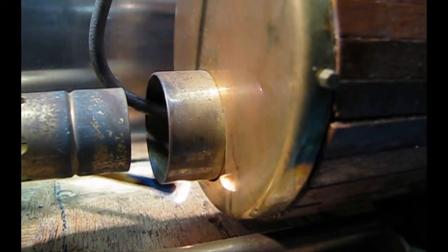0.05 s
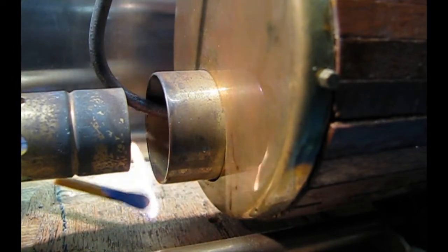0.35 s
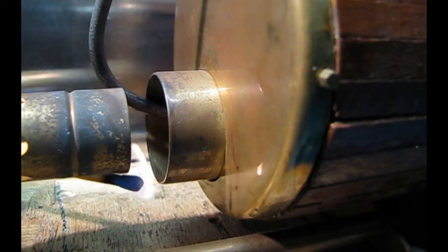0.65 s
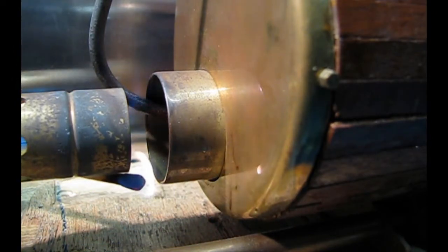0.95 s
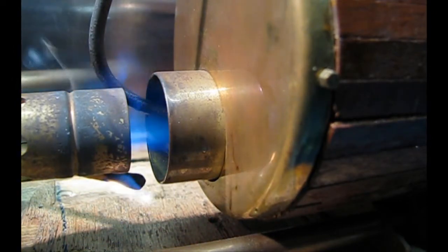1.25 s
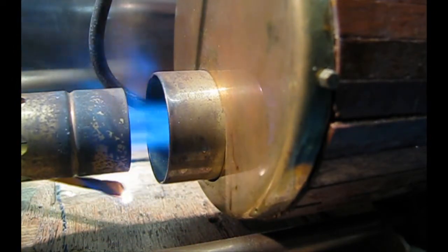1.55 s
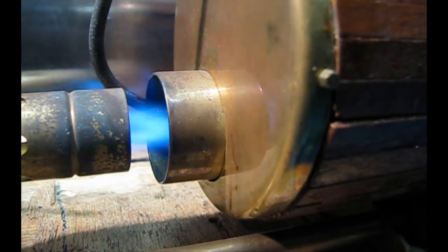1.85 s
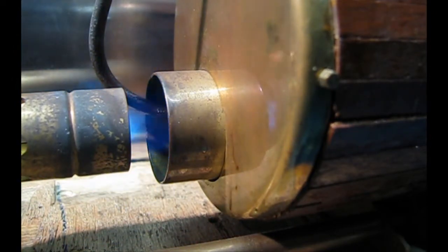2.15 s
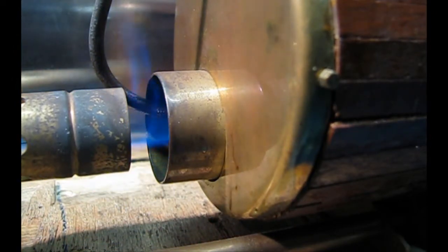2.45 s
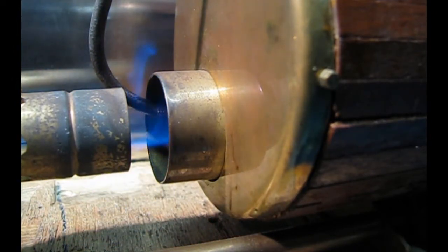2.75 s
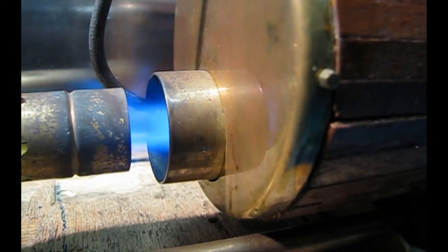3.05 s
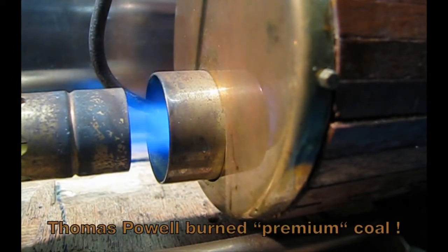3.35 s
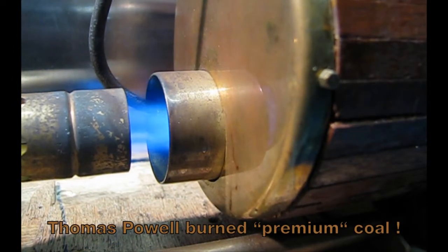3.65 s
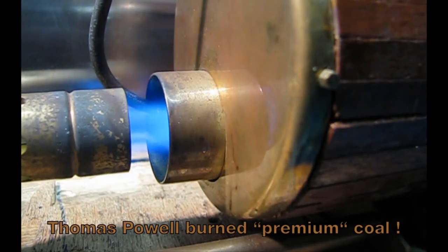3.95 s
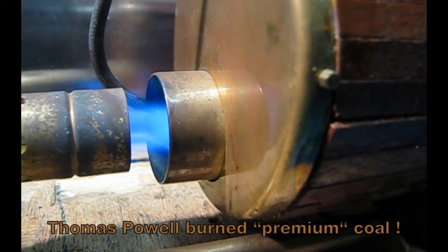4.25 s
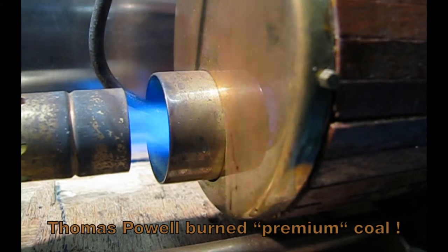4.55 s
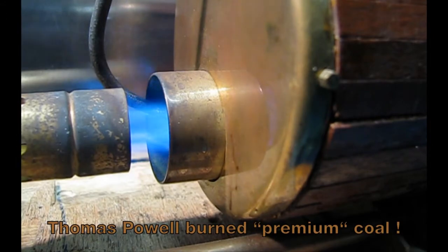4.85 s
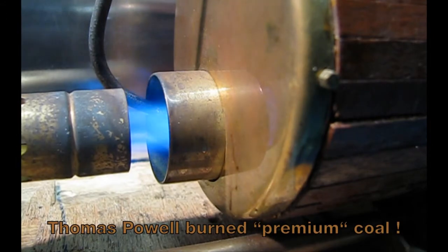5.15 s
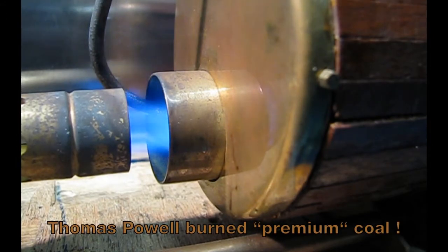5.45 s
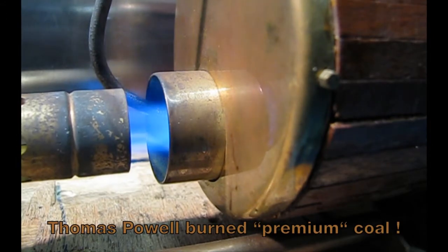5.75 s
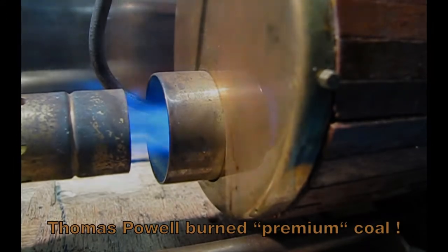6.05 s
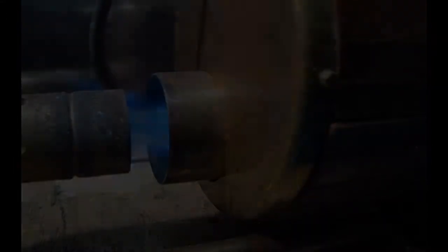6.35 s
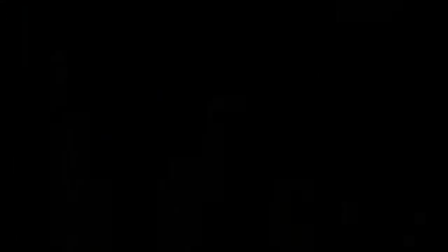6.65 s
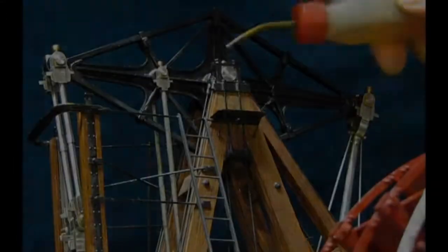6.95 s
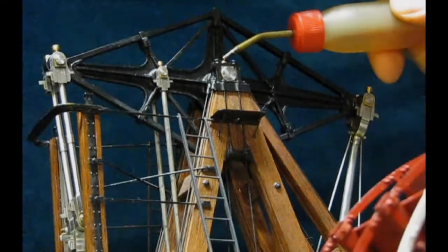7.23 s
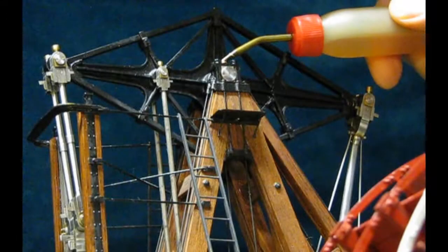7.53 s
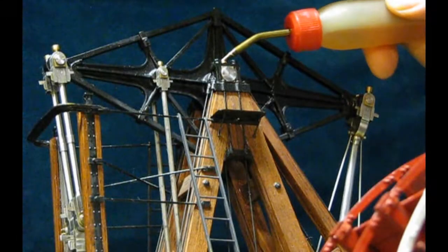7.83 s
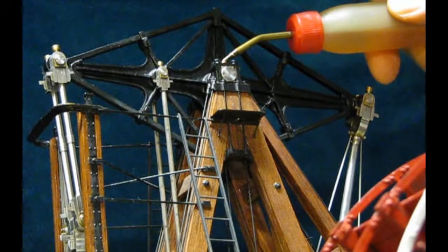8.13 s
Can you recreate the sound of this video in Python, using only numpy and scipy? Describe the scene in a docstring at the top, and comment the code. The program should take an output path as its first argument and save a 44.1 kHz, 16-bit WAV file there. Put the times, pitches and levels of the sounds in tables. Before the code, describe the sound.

Close to a small boiler, a valve squeaks briefly and metal ticks against metal over a faint hum. Gas lights with a weak sputter and a growing, half-whistling hiss, then thumps into a loud burn. The roar fades, crackles and drops out, leaving a soft hiss. Soon the flame is drawn back into the metal tube, where it roars evenly to the end with a few isolated pops.

```python
"""Light steel ticks and a valve's squeak over a low drone: a gas torch is lit at a small boiler's flue.
The gas catches, sputters and is drawn into the tube, snaps back out with a pop, hisses, then roars
steadily inside. The roar is turbulent burning, the pops are exploding pockets of gas, and the hiss is
the jet half whistling at its nozzle. The tube's resonances climb and sink with the heat of its gas."""
import sys
import numpy as np
from scipy import signal
from scipy.fft import rfft, irfft, next_fast_len
from scipy.io import wavfile
from scipy.ndimage import uniform_filter1d

SR = 44100
rng = np.random.default_rng(int(sys.argv[2]) if len(sys.argv) > 2 else 0)


def dump(signal):
    """Clip the signal to [-1, 1] and save it as 16-bit WAV at the path in sys.argv[1]."""
    limited = np.clip(np.atleast_2d(signal).T, -1, 1)
    pcm = np.round(limited * 32767).astype(np.int16)
    wavfile.write(sys.argv[1], SR, pcm)


N = 369999
SIZE, HOP = 1024, 256  # spectral frame and step, in samples
TIME, HZ = np.arange(N) / SR, np.fft.rfftfreq(SIZE, 1 / SR)
FRAME_TIME, SLOW_TIME = np.arange(-(-N // HOP) + 1) * HOP / SR, TIME[::16]

# speed of sound in the flue's gas, which tunes its resonances: time_s, pitch_factor
FLUE_HEAT = [(0, 0.69), (1.42, .74), (1.49, 0.83), (1.6, 0.985), (2, 0.91), (2.3, 0.76), (2.9, 0.74),
             (2.97, .84), (3.15, 0.99), (3.3, 1.014), (4.7, 0.987), (5.12, 1), (5.6, 1.055), (7, 1.073),
             (8.39, 1.074)]
# tone of burning gas: freq_hz, level_db
BURN_TONE = [(20, -49), (60, -19), (110, -6), (260, 0), (830, -0.5), (1100, -11.5), (1600, -15.5),
             (2200, -10), (2900, -18), (3500, -25.5), (5000, -30.5), (7700, -29.5), (8800, -40),
             (9400, -59)]
# unmoving peaks and dips of the torch head and collar: centre_hz, width_hz, gain_db
COLLAR_EQ = [(354, 100, 4.5), (522, 130, -2), (678, 55.5, 7), (1399, 146, -16.5), (5404, 450, 9.5)]
# hiss with the flame outside the flue: start_s, swallowed_s, final_db, growth_db_per_s, pitch_factor
HISS_SPELLS = [(1.136, 1.45, -27, 31.5, 1), (2.3, 2.94, -35, 13.5, 1)]
# the jet spits or falters: time_s, length_s, gain_db, pitch_factor_change
JET_SPITS = [(1.23, .05, 1, .035), (1.268, 0.02, -9, -.04), (1.292, 0.031, 7, .02),
             (1.348, .025, 1, -0.048), (1.393, 0.035, 9.5, .09), (1.547, 0.066, 10, .03),
             (2.425, 0.045, -9, -.04), (2.926, .036, 10.5, -0.041)]


def gain_of(db):
    """Decibels to amplitude."""
    return 10 ** (np.asarray(db) / 20)


def unit_rms(x):
    """Scales to rms 1."""
    return x / np.sqrt(np.mean(x ** 2) + 1e-20)


def spectrum(points, hz=HZ):
    """Points joined by straight lines over log frequency."""
    freqs, values = np.transpose(points)
    return np.interp(np.log(hz + 1), np.log(freqs + 1), values)


def curve(points, t=TIME):
    """Points joined by straight lines over time."""
    return np.interp(t, *np.transpose(points))


def bumps(rows, at):
    """Sum of bell shapes: centre, full width at half height, height."""
    return sum(height * np.exp2(-np.minimum((2 * (at - centre) / width) ** 2, 20))
               for centre, width, height in rows)


def fade(end, decay, t=TIME):
    """Holds 1 until the end, then dies away."""
    return np.exp(-np.clip((t - end) / decay, 0, 40))


def envelope(start, end, rise, decay, t=TIME):
    """Straight attack, hold, exponential release."""
    return np.clip((t - start) / rise, 0, 1) * fade(end, decay, t)


def add(mix, start_s, sound):
    """Lays a sound into the mix."""
    part = mix[round(start_s * SR):][:len(sound)]
    part += sound[:len(part)]


def wander(hz):
    """Random drift of rms 1 with changes up to about hz."""
    count = next_fast_len(len(SLOW_TIME))
    freqs = np.fft.rfftfreq(count, SLOW_TIME[1])
    drift = irfft(rfft(rng.standard_normal(count)) / (1 + (freqs / hz) ** 2), count)
    return np.interp(TIME, SLOW_TIME, unit_rms(drift[:len(SLOW_TIME)]))


def eddies(frames, bins):
    """Random patches over time and frequency, rms 1."""
    field = rng.standard_normal((len(FRAME_TIME), len(HZ)))
    return unit_rms(uniform_filter1d(uniform_filter1d(field, frames, axis=0), bins, axis=1))


def causal(db):
    """The minimum-phase response with this gain: it rings only after its cause."""
    cepstrum = irfft(np.log(gain_of(db)))
    cepstrum[..., 1:SIZE // 2] *= 2
    cepstrum[..., SIZE // 2 + 1:] = 0
    return np.exp(rfft(cepstrum))


def stereo(direct, scattered, response):
    """Colours a direct and a scattered signal and spreads them to left and right as mid and side."""
    likeness = [(20, 0.34), (100, .999), (300, 1), (1100, 0.98), (1400, 0.82), (2000, 0.98), (2900, 0.99),
                (3400, 0.43), (5200, 1), (5900, 0.39), (7200, 0.93), (8300, 0.86), (9200, 0.5),
                (16000, .55)]  # how alike the two channels are: freq_hz, coherence
    balance = [(300, 0), (900, 1.26), (1700, -2), (1950, -1), (2400, -0.5), (3130, 7.5), (3500, -3.5),
               (4100, -7.5), (4400, 9.5), (5350, 1), (6000, -2), (6500, -1), (8600, 0), (9400, 1)]  # left over right: freq_hz, gain_db
    phase_lead = [(1600, -0.01), (1850, 0.5), (2700, 0.91), (3300, 0.74), (3650, -0.5), (4000, 0.9),
                  (4250, 2), (4480, 1.5), (4750, 1.9), (5300, -1.3), (5550, -1), (6150, .5), (6600, -0.1),
                  (9000, 0)]  # left ahead of right: freq_hz, phase_rad
    framing = dict(nperseg=SIZE, noverlap=SIZE - HOP)
    coherence = np.clip(spectrum(likeness), 0, 1)
    mid = signal.stft(direct, **framing)[2].T * np.sqrt((1 + coherence) / 2)
    side = signal.stft(scattered, **framing)[2].T * np.sqrt((1 - coherence) / 2)
    lean = gain_of(spectrum(balance) / 2) * np.exp(.5j * spectrum(phase_lead))
    channels = np.array([(mid + side) * lean, (mid - side) / lean]) * response
    return signal.istft(channels, time_axis=1, freq_axis=2, **framing)[1][:, :N]


def background(drone_hz=57, drone_db=-38.5, waver=.54, waver_hz=6, draught_db=-42, calm_db=-62):
    """A soft wash of air and gas over a low drone and the rumble of draughts, which the jet stirs up."""
    wash_tone = [(45, -15.5), (90, -3.5), (160, -11.5), (360, -20.5), (530, -28.5), (1000, -26.5),
                 (1500, -31.5), (2300, -29), (4200, -34), (8500, -36), (10200, -37), (12000, -38),
                 (14300, -41), (15600, -46)]  # air and unlit gas: freq_hz, level_db
    wash_level = [(0, -38), (.7, -39.5), (1, -41.5), (2.4, -45.5), (8.39, -41)]  # their loudness: time_s, level_db
    whines = [(1030, 110, 2.5), (7880, 180, 5)]  # faint whines in the wash: centre_hz, width_hz, gain_db
    colour = gain_of(spectrum(wash_tone) + bumps(whines, HZ))
    wash = unit_rms(stereo(*rng.standard_normal((2, N)), colour)) * gain_of(curve(wash_level))
    phase = 2 * np.pi * drone_hz * TIME
    drone = (1 + waver * wander(waver_hz)) * np.cos(phase) + waver * wander(waver_hz) * np.sin(phase)
    drone = unit_rms(drone) * gain_of(drone_db) * fade(end=1.25, decay=.14)
    low_band = signal.butter(2, [18, 45], "band", fs=SR, output="sos")
    draught = signal.sosfilt(low_band, rng.standard_normal((3, N)))
    draught = unit_rms(draught[:2] * .37 + draught[2] * gain_of([[1.5], [-1.5]]))  # leans left
    settling = np.maximum(gain_of(draught_db) * fade(end=3.33, decay=.15), gain_of(calm_db))
    stirred = gain_of(-7) * jet_strength()
    return wash + drone + draught * np.hypot(settling, stirred)


def steel_ticks(band_ratio=1.2):
    """Brief scrapes of steel on steel, each a noise burst around one resonance."""
    contacts = [(.008, -32, 3800, .005), (.051, -25, 6000, .005), (0.104, -27, 3900, .004),
                (.1357, -31, 3800, .004), (.18, -27, 3650, 0.017), (.208, -31, 6600, .01),
                (.21, -30, 11400, .01), (0.444, -22.5, 3880, 0.00049), (1.0955, -26.5, 3580, 0.0036)]  # the torch touches metal: start_s, peak_db, centre_hz, decay_s
    t, out = np.arange(SR // 8) / SR, np.zeros((2, N))
    for start, db, hz, decay in contacts:
        band = signal.butter(1, [hz / band_ratio, hz * band_ratio], "band", fs=SR)
        for channel in out:
            scrape = signal.lfilter(*band, rng.standard_normal(len(t)) * np.exp(-t / decay))
            add(channel, start, gain_of(db) * scrape / abs(scrape).max())
    return out


def valve_squeak(start_s=.036, slip_s=.019, glide_s=.028, ring_s=.023, glide_hz=(2900, 2490), db=-28):
    """The valve sticks and slips: a short, unsteady falling note whose overtones die first."""
    end = start_s + slip_s
    hz = np.interp(TIME, [start_s, start_s + glide_s], glide_hz) * (1 + .022 * wander(hz=250))
    phase = 2 * np.pi * np.cumsum(hz) / SR
    overtones = gain_of(-6) * fade(end, decay=.003) * (np.sin(2 * phase) + .7 * np.sin(3 * phase))
    return (np.sin(phase) + overtones) * gain_of(db) * envelope(start_s, end, slip_s, ring_s)


def jet_strength(rise_s=.093, swallow_s=.011, linger_s=.14, linger_db=-14.5):
    """The hiss grows and spits until the flue swallows the flame; a little of it lingers."""
    t, level = SLOW_TIME, 0
    for start, end, db, growth, _ in HISS_SPELLS:
        body = envelope(start, end, rise_s, swallow_s, t)
        tail = gain_of(linger_db) * envelope(start, end, rise_s, linger_s, t)
        level = level + np.maximum(body, tail) * gain_of(db + growth * np.minimum(t - end, 0))
    spit_db = bumps([(s, length, db) for s, length, db, _ in JET_SPITS], t)
    return np.interp(TIME, t, level * gain_of(spit_db))


def jet_hiss(slack_pitch=.95, glide_s=.12, flutter_db=1.9, flutter_hz=50, patchy_db=3):
    """Gas hisses and half whistles out of the nozzle; the edge tones climb with its speed."""
    hiss_tone = [(1500, -12), (3700, -20), (4250, 3.5), (4550, -4), (5100, 5), (6000, -2), (7000, 1),
                 (8000, -0.5), (9000, -11.5), (9800, -11), (12200, -18), (14500, -12), (16000, -21)]  # rushing gas: freq_hz, level_db
    edge_tones = [(8840, 640, 7), (13500, 1250, 12)]  # breathy nozzle whistles: centre_hz, width_hz, gain_db
    climb = sum((full - slack_pitch) * envelope(start, end, glide_s, glide_s, FRAME_TIME)
                for start, end, _, _, full in HISS_SPELLS)
    bends = bumps([(s, length, bend) for s, length, _, bend in JET_SPITS], FRAME_TIME)
    pitch = slack_pitch + climb + bends
    noise = rng.standard_normal((2, N))
    db = spectrum(hiss_tone) + bumps(edge_tones, HZ / pitch[:, None])
    db += patchy_db * eddies(frames=5, bins=12)
    hiss = unit_rms(stereo(*noise, gain_of(db)))
    return hiss * jet_strength() * gain_of(flutter_db * wander(flutter_hz))


def flame(t, quench_s=.0045):
    """The flame's strength, brightness (dB) and coupling to the flue, shaken by gulps of air."""
    # spells of burning (lazy flame, gathered gas, turned up, drawn in, thrown out, in for good):
    # start_s, end_s, rise_s, level_db, drift_db_per_s, brightness_db, flue_coupling
    spells = [(.63, 1.57, .11, -39, 6, -4, .1), (.69, 0.88, 0.089, -28, -1, -1, .15),
              (1.12, 1.494, 0.2, -22.3, 5, 5.5, 0.22), (1.462, 2.325, .008, -12.5, -11, 0, 0.75),
              (2.32, 2.94, .02, -28, -2, 2, 0.27), (2.90, 8.5, 0.057, -15.5, -0.4, 0.43, 1.016)]
    gulps = [(0.806, 0.023, 4.5, -8), (0.846, .014, -7, -2), (1.203, 0.013, 11, -3), (1.262, .016, 6.5, -7),
             (1.34, 0.033, 4.5, 1.5), (1.394, 0.012, 8, -1), (1.429, 0.014, 6.5, 0), (1.45, 0.015, -8, -1),
             (1.487, 0.037, -3, 2), (1.529, .014, -11, -4), (1.564, 0.024, -4, -6), (1.796, 0.09, -1, -0.5),
             (1.895, 0.055, 2, 2), (2.315, .016, 3, 4), (2.396, 0.085, -2, -6), (2.44, .02, -7.5, 3),
             (2.459, 0.015, 7.5, -1), (2.575, 0.034, 4, 4), (2.83, 0.036, 2, 4), (2.903, .06, 2, 7.5),
             (2.972, 0.084, 4, -1), (3.029, 0.061, 1.5, 3), (3.26, 0.084, 2.2, 0),
             (4.777, 0.056, -2.5, -2.5), (4.884, 0.052, -0.5, -6.5), (4.967, .05, 1, 0.5),
             (5.082, 0.076, -4.5, -3), (6.655, 0.046, 1.5, 1.5)]  # the flame flares or starves: time_s, length_s, gain_db, brightness_db
    levels = [envelope(start, end, rise, quench_s, t) * gain_of(db + drift * (t.clip(start, end) - start))
              for start, end, rise, db, drift, _, _ in spells]
    powers = np.square(levels) + 1e-20
    brightness, coupling = np.transpose([spell[-2:] for spell in spells]) @ powers / powers.sum(0)
    flare_db = bumps([(s, length, db) for s, length, db, _ in gulps], t)
    glint_db = bumps([(s, length, bright) for s, length, _, bright in gulps], t)
    return np.sqrt(powers.sum(0)) * gain_of(flare_db), brightness + glint_db, coupling


def flue(t):
    """The tube's gain (dB) over time and frequency: it rings with the flame in it, higher when hot."""
    resonances = [(183, 63, 3), (900, 99, 8), (963, 48, -10), (1106, 96, 11.5), (1179, 77.5, -25),
                  (1700, 47, -3.5), (1881, 235, 13), (2072, 220, -12.5), (2446, 56, 3.5), (2670, 96, 8),
                  (2754, 51, -22), (2960, 194, 5.5), (3240, 250, -8.5), (3795, 190, 9.5), (4170, 62, 17),
                  (4250, 360, -6.5), (4853, 127, 9), (5045, 80, -16), (5145, 90, 10.5), (5306, 174, -17),
                  (5770, 140, 5), (5950, 240, -3.5), (6450, 230, 7), (6930, 370, -3), (7520, 510, 7),
                  (8620, 600, -8), (9930, 940, 8)]  # the tube's peaks and dips at pitch factor 1: centre_hz, width_hz, gain_db
    _, _, coupling = flame(t)
    return coupling[:, None] * np.interp(HZ / curve(FLUE_HEAT, t)[:, None], HZ, bumps(resonances, HZ))


def sputters(per_s=52, jitter_s=.003, spread_db=2.2, tilt=2):
    """A weak flame's small cracks at a loose pace, as rows of explosions for gas_pops."""
    spells = [(0.773, .84, -25), (2.139, 2.305, -19.5)]  # runs of sputtering: start_s, end_s, level_db
    chance = rng.standard_normal((len(spells), SIZE, 2))
    return [(s + jitter_s * late, db + spread_db * loud, tilt)
            for (start, end, db), draws in zip(spells, chance)
            for s, (late, loud) in zip(np.arange(start, end, 1 / per_s), draws)]


def gas_pops(trim_db=-.5, bass_db=11.5, spray=.13, spray_s=.002):
    """Each explosion is one push of pressure ringing in collar and flue; sharp ones add a brief spray."""
    # pockets of gas go off: start_s, level_db, tilt_db_per_octave (thump below 0, crack above)
    explosions = [(.7576, -15, 0.5), (0.8085, -19, 2.5), (.827, -23, 1), (.864, -23, 4), (0.8873, -18, 0.5),
                  (1.259, -3.5, -7.5), (1.388, -12, -3), (1.3945, -5, -0.5), (1.426, -4, -6.5),
                  (1.428, -3, -7), (1.4688, -10, -3), (1.476, 0, -7), (1.486, -7, -7), (1.499, -8, -2.5),
                  (1.542, -5, -4), (2.118, -4, .5), (2.279, -10, -1), (2.309, -10, -.5),
                  (2.316, -3.5, -2.5), (2.32, -3.5, -9), (3.029, -4, -.5), (3.545, -13, -1.5),
                  (4.213, -3, 0), (5.245, -0.5, -1), (6.545, -9, -1)]
    colour_db = spectrum(BURN_TONE) + bumps(COLLAR_EQ, HZ) + bass_db / (1 + (HZ / 100) ** 2)
    octaves = np.log2(np.clip(HZ, 50, 3000) / 700)
    out = np.zeros(N)
    for start, db, tilt in explosions + sputters():
        burst = spray * max(tilt + 1, 0) * rng.standard_normal(SIZE) * np.exp(-TIME[:SIZE] / spray_s)
        burst[0] += 1  # the push itself
        ring = irfft(causal(colour_db + flue(np.array([start]))[0] + tilt * octaves))
        pop = signal.fftconvolve(burst, ring)
        add(out, start, gain_of(db + trim_db) * pop / abs(pop).max())
    return out


def roar_colour(cold_bass_db=19.5, cold_bass_hz=130, patchy_db=1.34, glint_db=.75, glint_hz=14):
    """The roar's moving filter: burning gas heard through the collar and the warming flue."""
    fizz_tone = [(5000, -50), (9000, -43.5), (10600, -44.5), (12400, -36), (13000, -40), (13250, -46),
                 (16000, -48)]  # fizz of the flame front, pitched up by heat: freq_hz, level_db
    heat = curve(FLUE_HEAT, FRAME_TIME)[:, None]
    db = spectrum(BURN_TONE) + bumps(COLLAR_EQ, HZ) + flue(FRAME_TIME)
    db += (1.05 - heat) / .28 * cold_bass_db / (1 + (HZ / cold_bass_hz) ** 2)  # a cool, loose flame booms
    fizz = gain_of(spectrum(fizz_tone, HZ / np.sqrt(heat)))
    db = 20 * np.log10(np.hypot(gain_of(db), fizz))
    db += patchy_db * eddies(frames=14, bins=2)  # swirling hot gas favours now one pitch, now another
    brightness = flame(FRAME_TIME)[1] + glint_db * np.interp(FRAME_TIME, TIME, wander(glint_hz))
    treble_shelf = spectrum([(100, -.24), (800, .041), (1800, .93), (7000, .97), (12000, .4)])
    response = causal(db + brightness[:, None] * treble_shelf)
    body = (HZ > 150) & (HZ < 1200)  # this band keeps its power as the colour moves
    return response / np.sqrt(np.mean(abs(response) ** 2 * body, axis=1, keepdims=True))


def flame_roar(crackles_per_s=500, crackle_db=-4.5, cold_crackle_db=4.5, flutter_db=1, surge_db=.52):
    """Turbulent burning and tiny explosions: fluttering noise that crackles more when the gas is cool."""
    response = roar_colour()
    sizes = gain_of(2 * np.minimum(rng.exponential(1, N), 4))
    crackle = unit_rms(sizes * (rng.random(N) < crackles_per_s / SR))
    share = gain_of(crackle_db + cold_crackle_db * (1 - curve(FLUE_HEAT)) / .18)
    direct, scattered = rng.standard_normal((2, N))
    direct = (direct + share * (crackle - crackle.mean())) / np.sqrt(1 + share ** 2)
    unrest = unit_rms(gain_of(flutter_db * wander(hz=60) + surge_db * wander(hz=7)))
    strength = np.interp(TIME, SLOW_TIME, flame(SLOW_TIME)[0]) * unrest
    return stereo(direct * strength, scattered * strength, response)


def scene():
    """The torch, the flue and the air around them, in stereo."""
    return flame_roar() + jet_hiss() + steel_ticks() + valve_squeak() + background() + gas_pops()


def record(dry, cutoff_hz=15750):
    """Clips peaks at full scale, then cuts the highest treble."""
    lowpass = signal.firwin(511, cutoff_hz, window=("kaiser", 9), fs=SR)
    return signal.oaconvolve(np.clip(dry, -1, 1), lowpass[None], "same")


dry = scene()
out = record(dry)
dump(out)
```